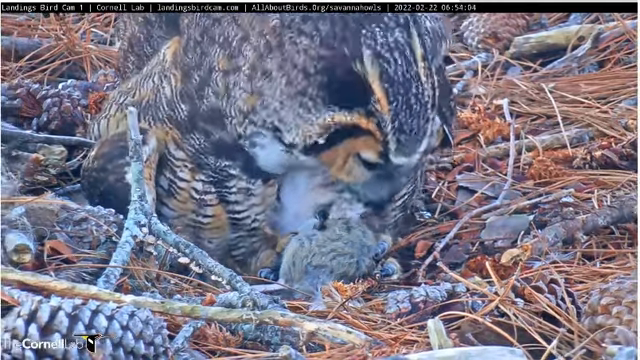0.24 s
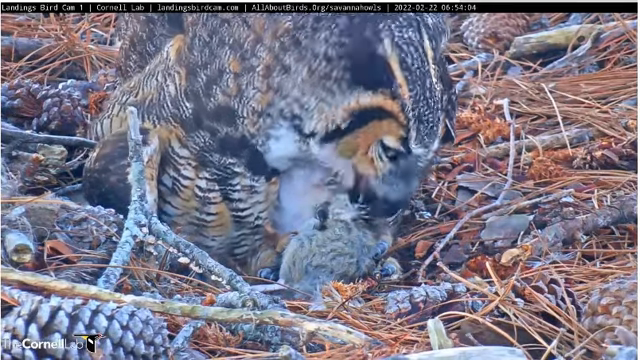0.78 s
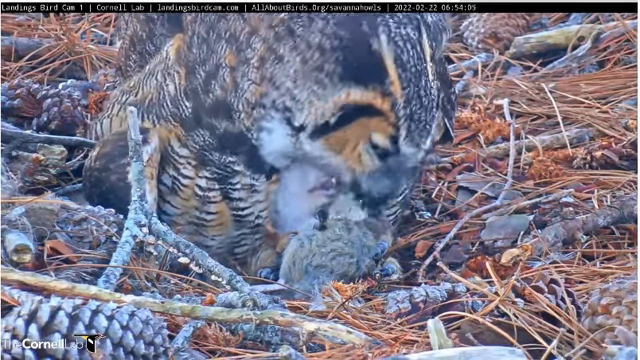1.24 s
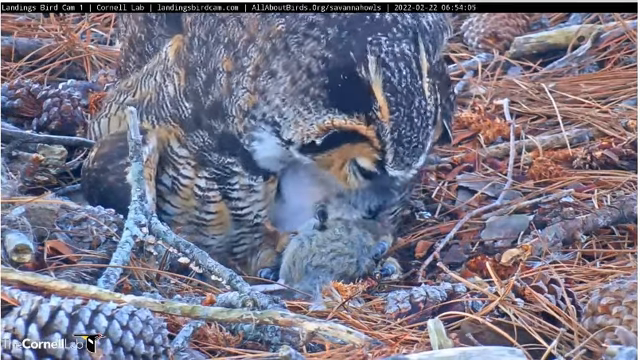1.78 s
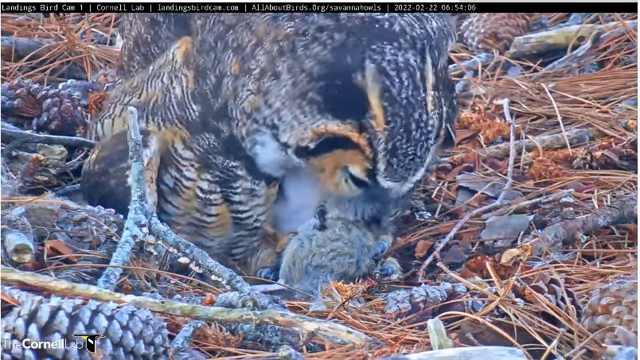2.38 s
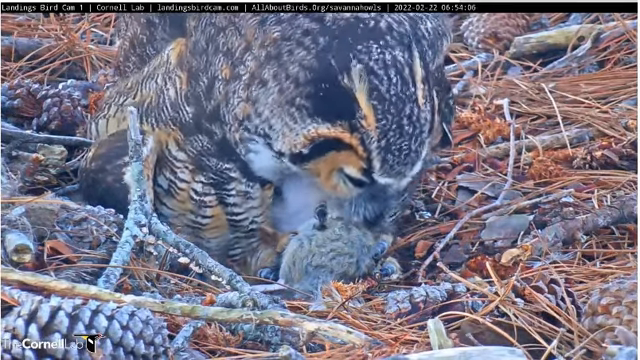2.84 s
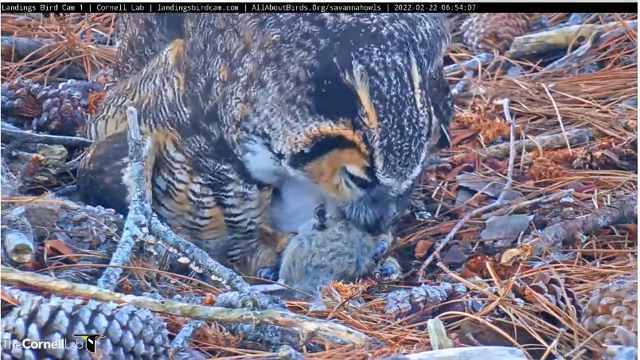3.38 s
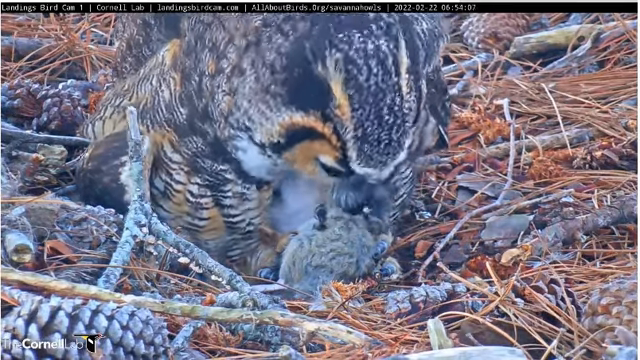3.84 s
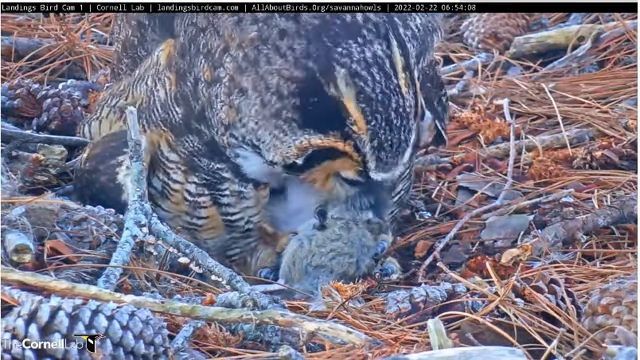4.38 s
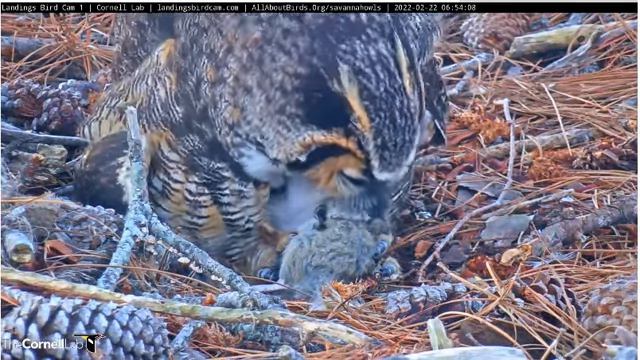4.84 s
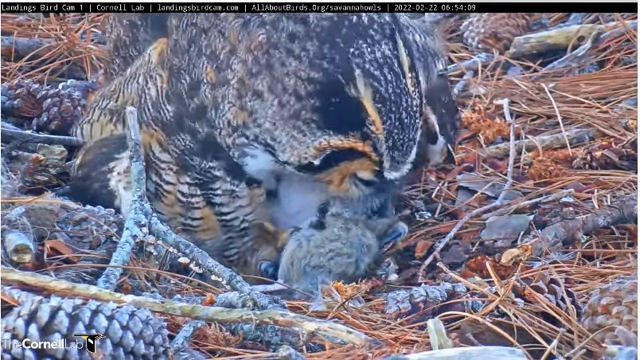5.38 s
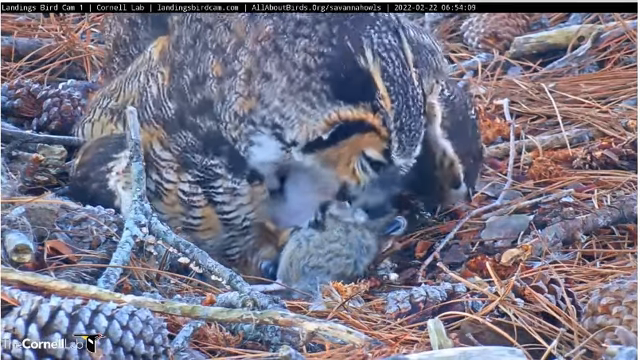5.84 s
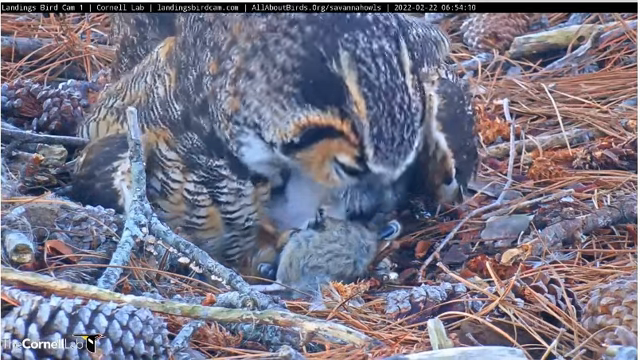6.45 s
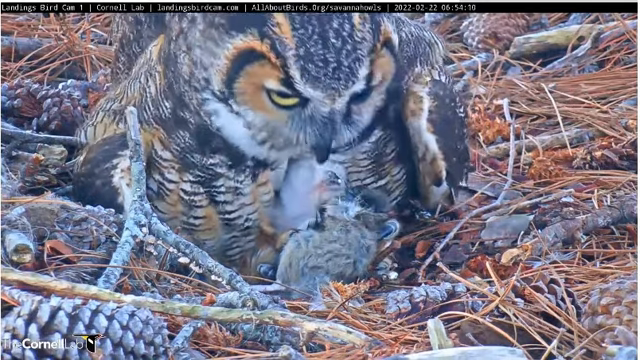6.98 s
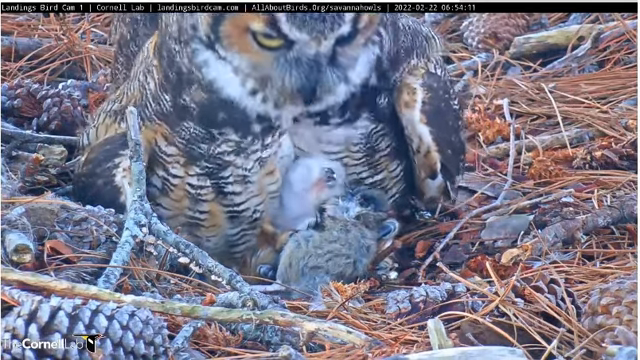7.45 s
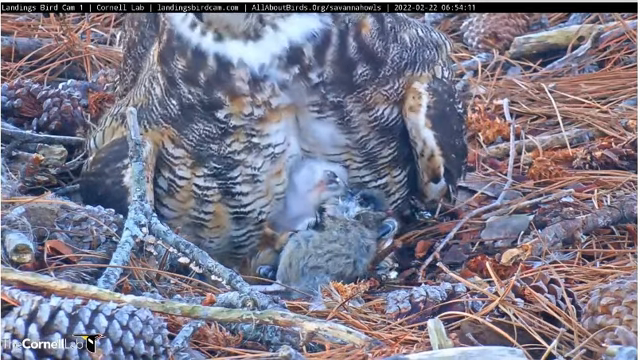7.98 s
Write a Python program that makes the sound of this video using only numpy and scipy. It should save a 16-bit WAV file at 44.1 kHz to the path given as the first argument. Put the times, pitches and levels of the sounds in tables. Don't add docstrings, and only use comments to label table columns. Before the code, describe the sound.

Woodland dawn chorus with sliding whistles, sharp repeated chips and two grainy bird rasps, over a steady high whine and faint distant traffic.

```python
import sys
import numpy as np
from scipy import signal
from scipy.fft import rfft, irfft, next_fast_len
from scipy.io import wavfile
from scipy.ndimage import uniform_filter1d, map_coordinates

SR = 44100
rng = np.random.default_rng(int(sys.argv[2]) if len(sys.argv) > 2 else 0)


def gain_from_db(level_db):
    decades = np.asarray(level_db, float) / 20
    return 10 ** decades


def inscribe(sig):
    pcm = np.round(np.clip(np.atleast_2d(sig).T, -1, 1) * 32767)
    wavfile.write(sys.argv[1], SR, pcm.astype(np.int16))


N = 361617
T = np.arange(N) / SR

# (start [s], hold [s], fall [s], pitch [Hz], level [dB])
SLURS = [
    (-.01, 0.11, 0.081, 2790, -32),
    (.178, 0.079, 0.066, 2723, -39),
    (.385, 0.089, 0.081, 2775, -32),
    (.487, 0.049, 0.068, 2813, -34.5),
    (5.19, .07, 0.086, 2780, -30.5),
    (5.598, 0.037, 0.058, 2760, -31),
]
# (start [s], hold [s], fall [s], pitch [Hz], level [dB])
FAR_SLURS = [(.785, 0.064, 0.085, 2766, -33.5), (1.205, 0.083, 0.059, 2866, -32),
             (1.545, 0.069, 0.023, 2840, -29), (1.63, 0.044, 0.083, 2810, -35.5),
             (4.915, .095, 0.051, 2766, -34.5), (5.25, 0.13, 0.045, 2829, -32)]
# (start [s], hold [s], fall [s], pitch [Hz], level [dB])
SAGGING_SLURS = [(2.705, .05, 0.027, 2773, -38), (3.055, 0.049, 0.031, 2770, -35),
                 (3.415, 0.057, .03, 2764, -35.5), (6.2, .12, 0.037, 2837, -39),
                 (6.79, .085, 0.014, 2790, -43), (7.16, 0.082, .045, 2827, -38),
                 (7.54, 0.058, 0.032, 2800, -36.5)]
# (start [s], length [s], from [Hz], to [Hz], level [dB])
PIPES = [(5.46, .13, 2798, 2806, -41.5), (6.06, 0.065, 2930, 3070, -33), (6.165, 0.051, 3045, 3040, -37.5),
         (6.255, 0.096, 3057, 3014, -37.5), (6.41, 0.12, 3020, 2955, -31), (6.59, 0.069, 3064, 3000, -34),
         (6.97, 0.1, 3010, 2990, -44), (7.1, 0.11, 2976, 2973, -31.5), (7.245, 0.043, 2980, 2990, -32),
         (7.33, .03, 3070, 2990, -41.5), (7.39, 0.054, 2974, 3000, -42), (7.235, 0.13, 3710, 3830, -39.5),
         (.81, .19, 4450, 4480, -46), (3.9, 0.22, 4567, 4400, -44.5)]
# (start [s], length [s], from [Hz], to [Hz], level [dB])
WHISTLES = [(.41, .055, 4640, 4560, -51.5), (.785, 0.2, 4115, 4160, -41.5),
            (1.117, 0.14, 4160, 4180, -50.5), (1.162, 0.11, 3700, 3765, -35.5),
            (1.265, 0.14, 3735, 3726, -34.5), (1.39, 0.062, 3740, 3730, -53),
            (1.684, 0.15, 3550, 3630, -33.5), (2.315, 0.18, 3950, 3896, -44.5),
            (2.321, .12, 4520, 4500, -57), (2.689, .17, 4410, 4530, -45.5), (2.9, 0.034, 4500, 4500, -51.5),
            (3.28, 0.048, 5290, 5400, -56.5), (4.31, 0.052, 3920, 3880, -51), (0.528, .1, 2224, 2180, -53),
            (5.4, 0.058, 2800, 2757, -39.5), (.41, .06, 5560, 5400, -63), (7.6, 0.082, 2690, 2580, -44.5),
            (1.525, 0.031, 2800, 2890, -30), (2.694, 0.18, 3496, 3640, -39),
            (3.143, .06, 3406, 3420, -33.5), (3.235, 0.13, 3470, 3490, -34.5),
            (3.52, 0.052, 4630, 4520, -44.5), (4.28, 0.037, 3776, 3950, -36.5),
            (6.256, 0.16, 3890, 3984, -38), (6.427, 0.19, 4200, 4175, -35),
            (5.13, 0.075, 2810, 2786, -38.5), (6.899, 0.17, 3800, 3770, -39.5),
            (6.84, .04, 3880, 3900, -45), (7.174, 0.19, 3400, 3560, -37), (7.375, 0.142, 3560, 3605, -34.5),
            (7.268, 0.17, 4500, 4560, -49), (7.41, .08, 4520, 4490, -50), (7.71, 0.05, 4670, 4720, -54),
            (7.752, 0.09, 3754, 3840, -43), (7.865, 0.14, 4470, 4600, -50),
            (7.988, 0.079, 4560, 4500, -45.5), (8.0, 0.03, 3620, 3490, -32.5),
            (8.035, 0.052, 3600, 3600, -39), (8.163, 0.05, 4450, 4430, -47), (1.945, .035, 2900, 2990, -37)]
# (start [s], length [s], from [Hz], to [Hz], level [dB])
SEETS = [(0.524, 0.25, 6770, 6780, -65.5), (1.098, 0.25, 6500, 6260, -57), (1.446, 0.18, 6480, 6530, -50.5),
         (1.551, 0.062, 5700, 5645, -69), (1.821, 0.21, 6660, 6720, -64), (2.39, 0.19, 6200, 6060, -63),
         (2.52, 0.11, 6720, 6850, -68.5), (2.928, 0.14, 6090, 6320, -57), (3.018, 0.22, 6240, 6120, -66.5),
         (3.63, 0.17, 6900, 6820, -66.5), (3.75, 0.094, 6740, 7050, -64), (4.156, 0.25, 6440, 6180, -58),
         (6.468, 0.14, 6600, 6390, -61), (6.948, 0.061, 6250, 6200, -63), (7.003, 0.097, 6250, 6190, -60),
         (7.02, 0.069, 6600, 6620, -71), (7.099, 0.092, 6480, 6400, -56.5), (7.169, 0.14, 6520, 6570, -58),
         (7.4, 0.12, 6500, 6660, -70.5), (7.65, 0.17, 6230, 6070, -67), (7.823, 0.22, 6670, 6850, -63.5),
         (8.146, .06, 6150, 6010, -63.5)]
# (start [s], length [s], from [Hz], to [Hz], level
# [dB])
SLIDES = [(.12, .05, 4900, 4100, -60), (.93, .08, 3650, 3200, -43), (2.57, .07, 1900, 3170, -47),
          (.155, .03, 3000, 2400, -48), (.272, .04, 3520, 3330, -43), (1.06, .08, 2300, 2420, -47),
          (1.4, 0.05, 3650, 3900, -41), (5.37, 0.033, 3150, 2400, -41), (6.84, .03, 4400, 5000, -55),
          (5.87, 0.052, 3600, 3900, -40), (1.434, .014, 5300, 6450, -57), (6.938, .012, 5500, 6250, -59),
          (1.7, .012, 5600, 6440, -63), (2.915, .015, 7400, 6700, -67), (7.5, .013, 6100, 6220, -66),
          (.78, .04, 5500, 4600, -60), (1.465, .09, 5900, 4050, -59), (2.275, .03, 6200, 4400, -56),
          (4.235, .04, 5700, 4000, -52), (4.535, .13, 6000, 4250, -60), (6.835, .035, 6500, 3900, -51),
          (5.107, .01, 3400, 5100, -50)]
# (start [s], length [s], from [Hz], to [Hz], level [dB])
TSIPS = [(0.867, 0.028, 5650, 5340, -46.5), (1.693, 0.013, 4210, 5520, -61),
         (3.518, 0.013, 5670, 4720, -56), (3.536, 0.028, 5630, 4580, -54.5),
         (4.713, 0.013, 7100, 6330, -63), (4.988, .015, 5120, 6840, -63), (5.342, 0.022, 5650, 3940, -53.5),
         (5.359, 0.013, 5230, 5100, -61), (5.504, 0.021, 3057, 2750, -32), (6.019, 0.02, 7080, 5870, -62.5),
         (6.046, 0.015, 7200, 6300, -66.5), (6.466, 0.0051, 5950, 6900, -68),
         (7.289, 0.0088, 6170, 7300, -55), (7.308, 0.0061, 5870, 7430, -66),
         (7.308, 0.021, 5030, 5300, -48), (7.99, 0.014, 4300, 3650, -39), (6.203, 0.026, 3670, 3900, -36),
         (1.09, .016, 3795, 3400, -40), (5.175, 0.019, 3360, 3620, -42.5), (5.28, 0.02, 3860, 3620, -50),
         (1.158, .035, 2950, 2860, -37), (2.996, 0.049, 3120, 2800, -42), (3.128, 0.023, 4570, 4340, -45.5),
         (3.41, 0.022, 4520, 4330, -44), (3.974, 0.018, 3460, 3620, -35), (7.757, 0.016, 6930, 6760, -61),
         (.708, 0.012, 7100, 6500, -57), (5.64, 0.034, 2850, 2800, -33), (1.585, 0.022, 3650, 3400, -39),
         (5.39, .03, 2600, 2250, -44), (2.72, 0.021, 3200, 3000, -32), (2.755, .014, 3200, 3050, -42),
         (3.93, 0.028, 3250, 3100, -36.5), (2.86, .025, 3750, 3900, -38.5)]
# (time [s], pitch [Hz], level [dB])
ARCH = [
    (.985, 5800, -63),
    (1.0, 7000, -58),
    (1.03, 7170, -56),
    (1.078, 7180, -57),
    (1.097, 5800, -60),
]
# (time [s], peak [dB], hook under the peak [dB])
CHIPS = [
    (2.6614, -24, 13.5),
    (2.9453, -23.5, 13.5),
    (3.2286, -23.5, 14),
    (3.5169, -23, 15),
    (3.8067, -22, 21),
    (7.519, -24, 31),
    (7.8028, -22.5, 23.5),
    (8.084, -22, 19),
]
# (time [s], pitch [Hz])
CHIP_WHIP = [(0, 2983), (.009, 3124), (.012, 3640), (0.02, 4340), (.028, 4380)]
# (first breath [s], burst [s], end [s], voice [dB], voice fade [dB])
RASPS = [
    (2.095, 2.098, 2.305, -32.5, 15),
    (6.52, 6.658, 6.84, -34, 9),
]
# (multiple, level [dB])
RASP_TONES = [(2, 6), (3, -16), (4, -16.5)]
# (frequency [Hz], level [dB])
THROAT = [(2000, -43), (2800, -9.5), (3500, 1), (4400, 3.5), (5300, -1.5), (5700, -17), (6300, -16),
          (6900, -38)]
# (frequency [Hz], level [dB])
OPEN_BILL = [(2900, -30), (3350, 0.5), (3900, -3), (4400, -1), (5300, -22)]
# (start [s], length [s], top [Hz], end [Hz], level [dB])
HONKS = [
    (0.168, 0.22, 1502, 1001, -41),
    (1.165, 0.18, 1245, 1003, -48.5),
]
# (start [s], length [s], from [Hz], to [Hz], level [dB])
MATE_HONKS = [
    (-.02, .12, 1500, 1200, -43),
    (0.17, 0.038, 1500, 2200, -47.5),
    (.29, 0.17, 1800, 1380, -46),
    (.24, .1, 1450, 1100, -42.5),
]
# (start [s], length [s], from [Hz], to [Hz], level [dB])
CLUCKS = [(0.487, 0.015, 1070, 1060, -48), (2.095, 0.017, 1077, 1024, -44),
          (2.867, 0.023, 1025, 1033, -50.5), (2.92, 0.048, 1160, 1099, -48.5),
          (4.16, 0.036, 1003, 995, -48.5), (4.298, 0.014, 967, 900, -48.5), (4.47, .02, 1075, 1050, -45),
          (4.629, 0.014, 1280, 1230, -48), (6.109, .04, 1051, 1057, -51)]
# (frequency [Hz], t60 [s])
WOOD_T60 = [(1000, 1), (3000, 1), (7000, 0.37)]
# (time [s], level [dB])
CHORUS = [(0.0, -42), (0.87, -43), (1.64, -41), (2.42, -40), (2.88, -37.5), (3.9, -38), (4.73, -43.5),
          (5.34, -43.5), (5.94, -40.5), (6.6, -35.5), (7.1, -38.5), (8.2, -38.5)]
# (frequency [Hz], density [dB per Hz])
CHORUS_BODY = [(1120, -57.5), (1900, -28.5), (2290, -14), (2590, -8.5), (2730, -2.5), (2820, -1.5),
               (2970, -3), (3260, -1.5), (5200, -30), (6760, -50), (11400, -120)]
# (frequency [Hz], density [dB per Hz])
CHORUS_TOP = [(2650, -32), (4500, -7.5), (4990, -5), (5560, -10.5), (5860, -14), (6580, -12), (7240, -22.5),
              (9410, -49.5), (15900, -120)]
# (time [s], level [dB])
MOTOR_LOAD = [(0, -2), (1.5, 1.5), (2.6, -0.5), (3.3, -1), (4.3, 1), (5.5, 0), (6.6, 1), (7.3, -1),
              (8.2, -3)]
# (multiple, level [dB])
SHAFT_ORDERS = [(4, -74), (5, -73.5), (7, -76), (12, -76), (16, -74.5), (20, -62), (24, -46.5), (25, -60.5),
                (28, -74)]
# (frequency [Hz], level [dB])
WHINES = [(1053, -61), (2744, -59.5), (3159, -67.5)]
# (frequency [Hz], density [dB per Hz])
TRAFFIC = [(24, -74), (40, -47), (86, -34.5), (105, -19), (172, -5.5), (350, -6), (437, -12.5), (459, -13),
           (593, -15.5), (623, -18), (764, -18), (1020, 0), (1780, -12.5), (2080, -17), (2300, -9),
           (2990, -29), (5060, -120)]

SAG, FAR_SAG, DEEP_SAG, SAG_S = 0.99, 0.98, 0.95, .1
FALL_DB, FAR_FALL_DB = (8, 15), (12, 18)
SWELL, SWELL_DB, WANE_DB, BEND = .3, 2, 3, .4
SEET_WANE_DB, SEET_BEND = 6.5, .55
SLIDE_HALF = 0.43
PIPE_FLUTTER = 1.9
WHIP_DB, AFTER_DB, OVERTONE_DB = 14.5, 14, 42
RASP_LOW_HZ, RASP_HIGH_HZ, RASP_END_HZ = 1598, 1850, 1380
RASP_JUMP_S, RASP_DROP_S = .085, 0.034
VOICE_HOLD_S, VOICE_BREAK_S = .055, .04
KICK_DB, KICK_S = 4.5, .012
BREATH_DB, BREATH_RISE_S, BREATH_DROP_DB = (-39.5, -41.5), 0.044, 5.5
LEAD_DB = 5
BILL_DB, BILL_S = (-44, -33), .09
HONK_RISE, HONK_HOLD, HONK_FROM = 0.1018, .24, .78
HONK_KICK_DB, HONK_FADE_DB = 9.5, 6.5
HOARSE, MATE_HOARSE = .25, .8
TOP_DB, TOP_FOLLOWS = -65.5, 0.092
SHAFT_HZ, TRAFFIC_DB = 117.1, -51.5
OPEN_DB, DUCK_DB, DUCK_S, RECOVER_S = 1, (5, 10), 0.023, 0.25


def unit(x):
    return x / np.sqrt(np.mean(x ** 2) + 1e-20)


def along(points, hz):
    f, v = np.transpose(points)
    return np.interp(np.log(hz + 1), np.log(f + 1), v)


def wobble(rate):
    knots = rng.standard_normal(int(N * rate / SR) + 4)
    return np.interp(T, T[::8], map_coordinates(knots, [T[::8] * rate]))


def coloured(x, spectrum):
    m = next_fast_len(N + SR // 5)
    gain = gain_from_db(along(spectrum, np.fft.rfftfreq(m, 1 / SR)))
    return irfft(rfft(x, m) * gain, m)[..., :N]


def rush(spectrum, patchy_db):
    z = signal.stft(rng.standard_normal(N), nperseg=512)[2]
    field = uniform_filter1d(uniform_filter1d(rng.standard_normal(z.shape), 4, 0), 10, 1)
    patchy = signal.istft(z * gain_from_db(patchy_db * unit(field)), nperseg=512)[1][:N]
    return unit(coloured(patchy, spectrum))


def add(out, rows, drift, flutter_db, edge, multiple=1):
    s, hz, db = np.transpose(rows)
    part = slice(max(int(s[0] * SR), 0), max(int(s[-1] * SR), 0))
    t = T[part]
    pitch = uniform_filter1d(np.interp(t, s, hz), 200) * (1 + drift[part])
    fade = np.sin(np.pi / 2 * np.clip(np.minimum(t - s[0], s[-1] - t) / edge, 0, 1)) ** 2
    level = gain_from_db(np.interp(t, s, db) + flutter_db[part])
    phase = 2 * np.pi * multiple * np.cumsum(pitch) / SR
    out[part] += np.sqrt(2) * fade * level * np.sin(phase)


def slur(s, hold, fall, hz, db, sag, loss_db):
    sagged = sag ** (hold / SAG_S)
    return [(s, hz, db), (s + .3 * hold, hz * (.8 + .2 * sag), db + 1.5), (s + hold, sagged * hz, db),
            (s + hold + 0.44 * fall, (sagged - .07) * hz, db - loss_db[0]),
            (s + hold + fall, .78 * hz, db - loss_db[1])]


def held_note(s, length, a, b, db, bend, wane_db):
    return [(s, a, db - SWELL_DB), (s + SWELL * length, a + bend * (b - a), db), (s + length, b, db - wane_db)]


def whistlers():
    out, drift, flutter_db = np.zeros((2, N)), .002 * wobble(60), 2.1 * wobble(45)
    broken_db = np.clip(PIPE_FLUTTER * np.resize(flutter_db[::2], N), -8, 3)
    slurs = [slur(*row, SAG, FALL_DB) for row in SLURS]
    slurs += [slur(*row, FAR_SAG, FAR_FALL_DB) for row in FAR_SLURS]
    slurs += [slur(*row, DEEP_SAG, FAR_FALL_DB) for row in SAGGING_SLURS]
    slurs += [ARCH]
    held = [held_note(*row, BEND, WANE_DB) for row in PIPES + WHISTLES]
    held += [held_note(*row, SEET_BEND, SEET_WANE_DB) for row in SEETS]
    slides = [[(s, a, db), (s + SLIDE_HALF * length, (a + b) / 2, db), (s + length, b, db)]
              for s, length, a, b, db in SLIDES]
    flicks = [[(s, a, db), (s + length, b, db)] for s, length, a, b, db in TSIPS]
    first_pipe, first_quick = len(slurs), len(slurs) + len(held)
    for k, rows in enumerate(slurs + held + slides + flicks):
        piping = first_pipe <= k < first_pipe + len(PIPES)
        thin = first_quick - len(SEETS) <= k <= first_quick
        shake_db = broken_db if piping or thin else flutter_db
        shift = k * SR // 11
        edge = min(.016, (rows[-1][0] - rows[0][0]) / 3)
        add(out[int(k >= first_quick)], rows, np.roll(drift, shift), np.roll(shake_db, shift), edge)
    return out


def chipper():
    out, still = np.zeros(N), 0.0034 * wobble(150)
    for k, (s, db, hook_db) in enumerate(CHIPS):
        levels = db - np.array([1.5, 2, .7 * WHIP_DB, WHIP_DB, WHIP_DB + 4])
        after = db - AFTER_DB
        whip = [(s - .004 + u, hz, level) for (u, hz), level in zip(CHIP_WHIP, levels)]
        octave = [(s - .004 + u, hz, db - OVERTONE_DB) for u, hz in CHIP_WHIP[:3]]
        add(out, whip, still, still, edge=.004)
        add(out, octave, still, still, edge=.004, multiple=2)
        add(out, [(s + .058, 3150, after), (s + .076, 2980, after - 3)], still, still, edge=.005)
        add(out, [(s + .054, 3900, after + 1.5), (s + .068, 3700, after - 2)], still, still, edge=0.0055)
        if k + 1 < len(CHIPS) and CHIPS[k + 1][0] - s < 1:
            hook = db - hook_db
            rows = [(s + .165, 3480, hook - 8), (s + .19, 3860, hook - 2), (s + .215, 3920, hook - 3)]
            add(out, rows, still, still, edge=.008)
    return out


def rasper():
    voice, breath, bill = np.zeros((3, N))
    vibrato, pulsing_db = .04 * wobble(420), np.clip(4.5 * wobble(300), -12, 3)
    for (start, burst, end, voice_db, fade_db), breath_db, bill_db in zip(RASPS, BREATH_DB, BILL_DB):
        brink, jump, drop = max(start, burst - .004), start + RASP_JUMP_S, end - RASP_DROP_S
        kicked, held = burst + KICK_S, burst + VOICE_HOLD_S
        broken = held + VOICE_BREAK_S
        s = np.unique([start, brink, burst, kicked, held, broken, jump - .03, jump, drop, end])
        hz = np.interp(s, [jump - .03, jump, drop, end],
                       [RASP_LOW_HZ, RASP_HIGH_HZ, RASP_HIGH_HZ, RASP_END_HZ])
        loss_db = np.interp(s, [start, brink, burst, kicked, held, broken],
                            [2 * LEAD_DB, LEAD_DB, -KICK_DB, 0, 1.5, fade_db])
        settled = np.clip(abs(T - burst) / KICK_S, 0, 1)
        for multiple, db in RASP_TONES:
            rows = np.transpose([s, hz, voice_db - loss_db + db])
            add(voice, rows, vibrato, settled * pulsing_db, edge=0.0017, multiple=multiple)
        bill += gain_from_db(bill_db - np.interp(T, [start, brink, burst, burst + BILL_S, end],
                                        [18.5, 5.5, -1.5, 1.5, 7], 100, 100))
        breath += gain_from_db(breath_db - np.interp(T, [start, brink, burst, burst + BREATH_RISE_S, drop, end],
                                            [2 * LEAD_DB, 1.3 * LEAD_DB, 1.5, 0, 2.5, BREATH_DROP_DB], 100, 100))
    air = breath * rush(THROAT, patchy_db=2.6) + bill * rush(OPEN_BILL, patchy_db=2.5)
    tract = [(2000, -38.0), (2700, 0.5), (6500, -12.0), (7200, -22.0)]
    return coloured(voice, tract) + gain_from_db(0.5 * pulsing_db) * air


def honker():
    out, mate = np.zeros((2, N))
    for s, length, top_hz, end_hz, db in HONKS:
        rows = [(s, HONK_FROM * top_hz, db + HONK_KICK_DB), (s + HONK_RISE * length, top_hz, db),
                (s + HONK_HOLD * length, top_hz, db), (s + length, end_hz, db - HONK_FADE_DB)]
        add(out, rows, .015 * wobble(200), 1.5 * wobble(90), edge=.009)
    for s, length, a, b, db in MATE_HONKS:
        add(mate, [(s, a, db), (s + length, b, db)], .018 * wobble(200), 2.5 * wobble(90), edge=.015)
    for s, length, a, b, db in CLUCKS:
        add(out, [(s, a, db), (s + length, b, db)], 0 * T, 0 * T, edge=.006)
    hoarse_mate = mate * (1 + MATE_HOARSE * wobble(500)) / np.hypot(1, MATE_HOARSE)
    return out * (1 + HOARSE * wobble(400)) + hoarse_mate


def boughs(x):
    t = np.arange(SR // 12) / SR
    answer = rng.standard_normal(len(t)) * gain_from_db(-60 * t / 0.075)
    return signal.oaconvolve(x, answer / np.linalg.norm(answer))[:N]


def wood(x, count):
    out, step = np.zeros(N + SR), N // (count - 1) + 1
    for k in range(count):
        hz, t, z = signal.stft(rng.standard_normal(SR // 2), SR, nperseg=256)
        decay = gain_from_db(-60 * t / along(WOOD_T60, hz)[:, None])
        tail = signal.istft(z * decay, SR, nperseg=256)[1]
        part = np.arange(max(k - 1, 0) * step, min((k + 1) * step, N))
        crossfade = 1 - abs(part / step - k)
        answer = signal.oaconvolve(x[part] * crossfade, tail / np.linalg.norm(tail))
        out[part[0]:][:len(answer)] += answer
    return out[:N]


def chorus(count=900):
    flock_db = np.interp(T, *np.transpose(CHORUS))
    songs, still = np.zeros(N), np.zeros(N)
    for start, length, pitch, bend, size in rng.random((count, 5)):
        s, hz, db = start * T[-1], 2300 * 2.8 ** pitch, 5 * size
        rows = [(s, hz, db), (s + .015 + 0.03 * length, hz * (1 + .3 * (bend - .6)), db)]
        add(songs, rows, still, still, edge=0.014)
    far = .3 * unit(songs) + unit(wood(songs, count=4))
    body = unit(0.8 * unit(coloured(far, CHORUS_BODY)) + rush(CHORUS_BODY, patchy_db=3.5))
    top = unit(0.84 * unit(coloured(far, CHORUS_TOP)) + rush(CHORUS_TOP, patchy_db=4.5))
    top_db = TOP_DB + TOP_FOLLOWS * (flock_db - flock_db.mean())
    return gain_from_db(flock_db) * body + gain_from_db(top_db) * top


def motor():
    turn = 2 * np.pi * SHAFT_HZ * np.cumsum(1 + 0.000684 * wobble(1.497)) / SR
    lines = [(k * turn, db) for k, db in SHAFT_ORDERS]
    lines += [(2 * np.pi * hz * T + wobble(11), db) for hz, db in WHINES]
    tones = sum(np.sqrt(2) * gain_from_db(db + 2.7 * wobble(8)) * np.sin(phase) for phase, db in lines)
    return gain_from_db(np.interp(T, *np.transpose(MOTOR_LOAD))) * tones


def traffic():
    cavity = [(700, -38.5), (950, -6.5), (1080, 6.5), (1300, -13.5), (1600, -37.5)]
    hollow = gain_from_db(-62.0 + 5 * wobble(16)) * rush(cavity, patchy_db=4.5)
    return gain_from_db(TRAFFIC_DB + 0.74 * wobble(3.026)) * rush(TRAFFIC, patchy_db=2.0) + hollow


def ducking():
    dips = [db * np.interp(T, [burst, burst + DUCK_S, end, end + RECOVER_S], [0, 1, 1, 0])
            for (_, burst, end, *_), db in zip(RASPS, DUCK_DB)]
    return gain_from_db(OPEN_DB - sum(dips))


def scene():
    (held, quick), chips, honks, rasps = whistlers(), chipper(), honker(), rasper()
    sent = gain_from_db(-12) * chips + gain_from_db(-11) * rasps + gain_from_db(-8.5) * held + gain_from_db(-4) * quick
    echo = wood(sent + gain_from_db(-3.5) * honks, count=10)
    scatter = boughs(gain_from_db(-11.5) * held + gain_from_db(-4) * quick + gain_from_db(-6) * honks)
    near = held + gain_from_db(-3) * quick + scatter + chips + honks + echo + rasps
    background = ducking() * (motor() + traffic() + chorus())
    return (near + background)[None]


def top_cut(x):
    return signal.sosfilt(signal.butter(12, 7390, fs=SR, output="sos"), x)


def record(dry):
    band = [(30, -21), (70, -4.5), (100, -2.5), (7000, -2.5), (7300, -7.0), (7420, -29.0), (7650, -68)]
    hiss = gain_from_db(-83) * rng.standard_normal(dry.shape)
    return top_cut(coloured(dry, band) + hiss)


dry = scene()
out = record(dry)
inscribe(out)
```